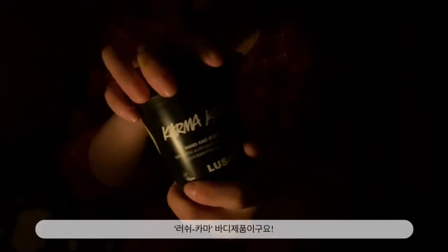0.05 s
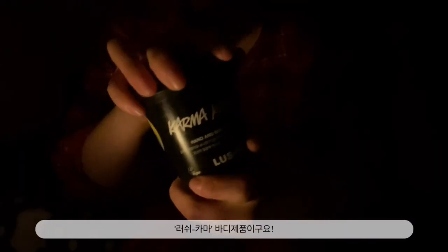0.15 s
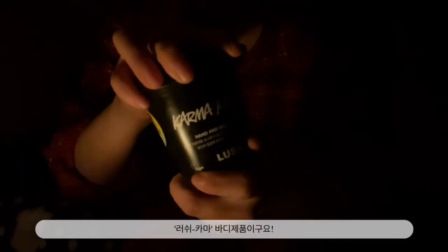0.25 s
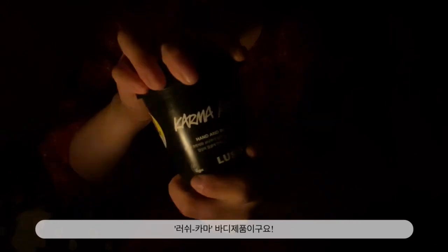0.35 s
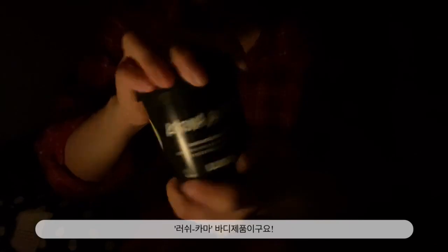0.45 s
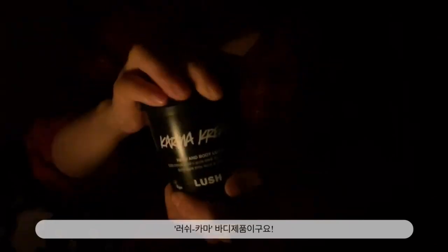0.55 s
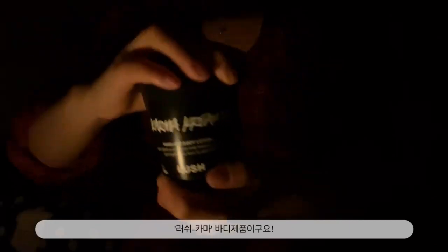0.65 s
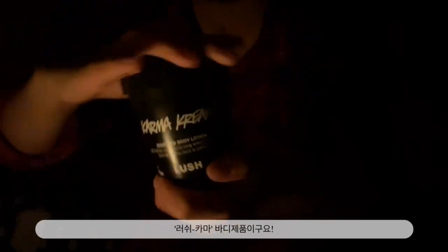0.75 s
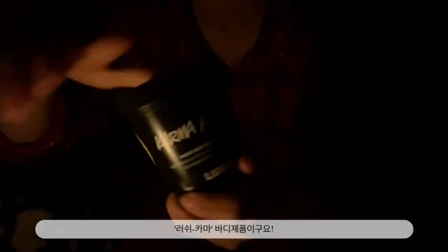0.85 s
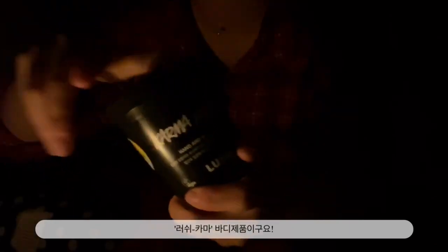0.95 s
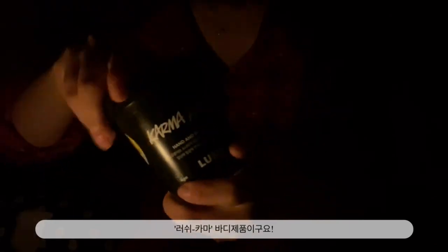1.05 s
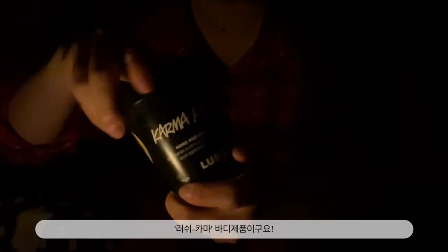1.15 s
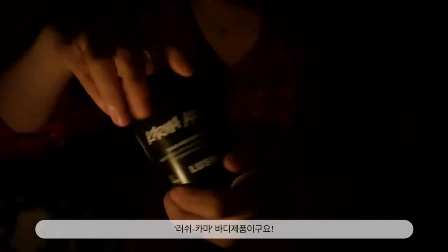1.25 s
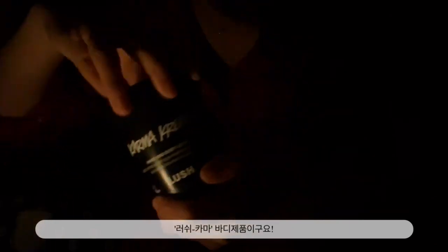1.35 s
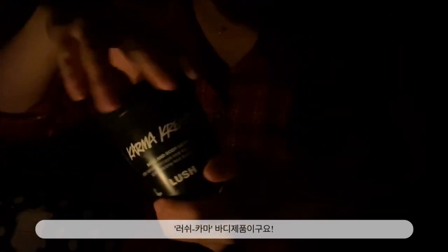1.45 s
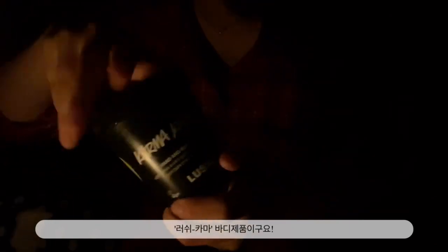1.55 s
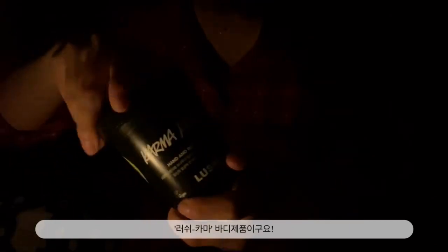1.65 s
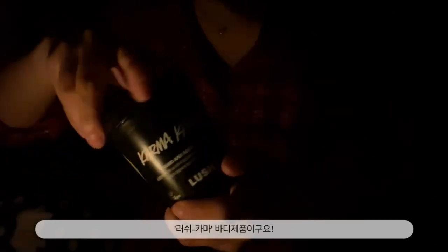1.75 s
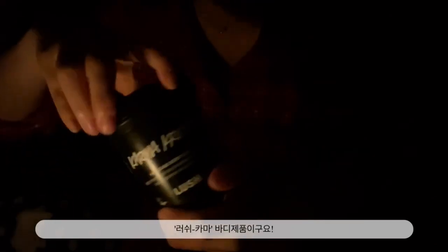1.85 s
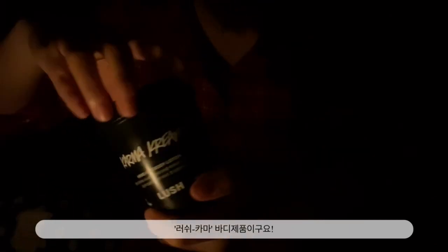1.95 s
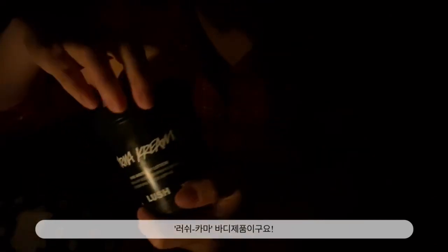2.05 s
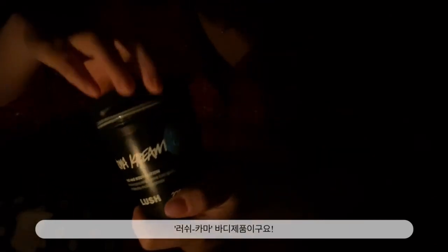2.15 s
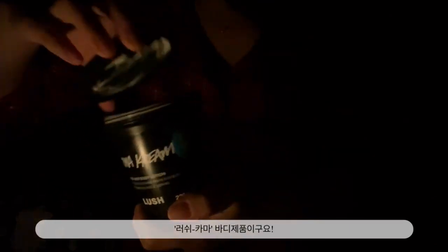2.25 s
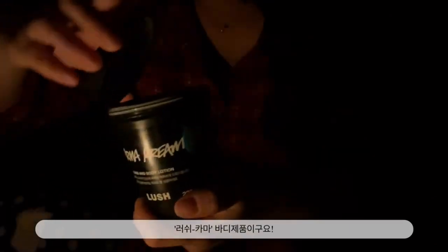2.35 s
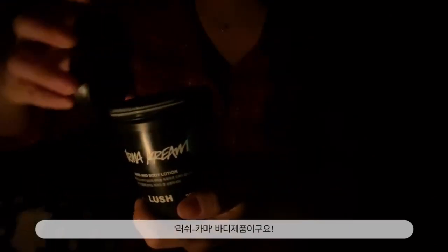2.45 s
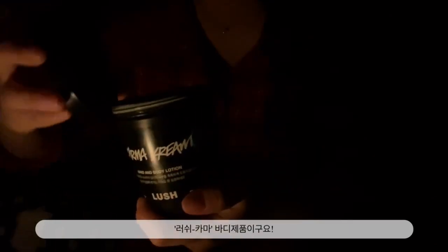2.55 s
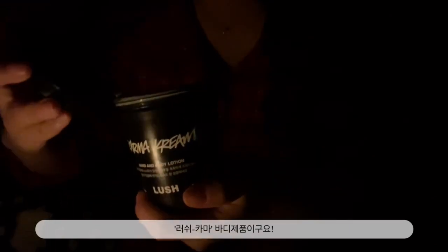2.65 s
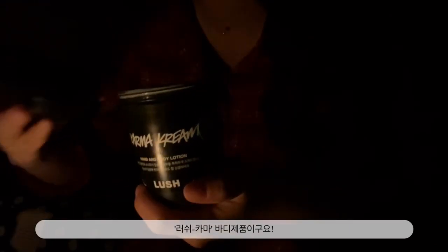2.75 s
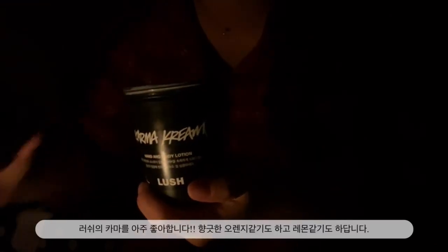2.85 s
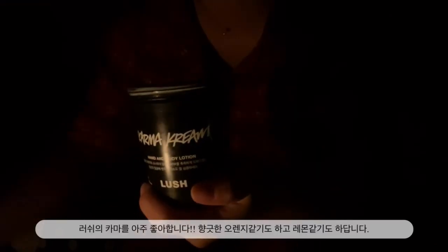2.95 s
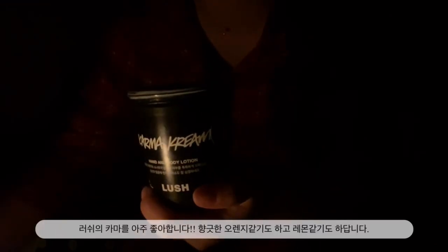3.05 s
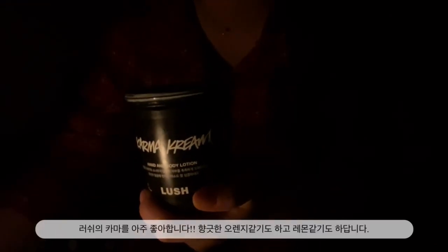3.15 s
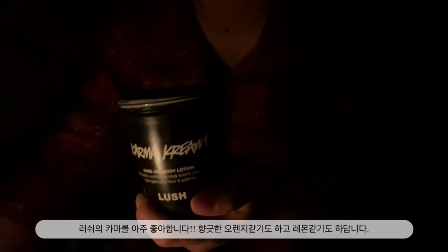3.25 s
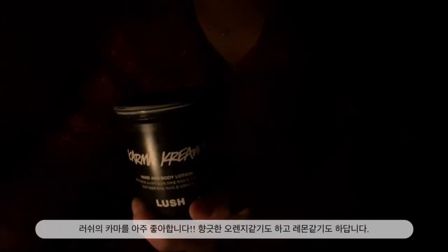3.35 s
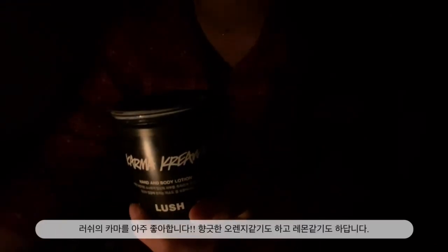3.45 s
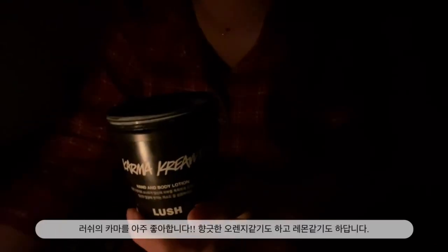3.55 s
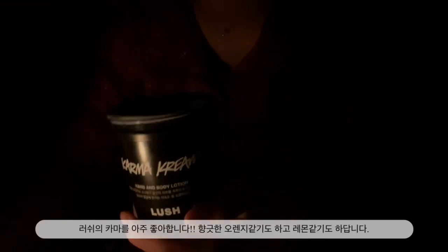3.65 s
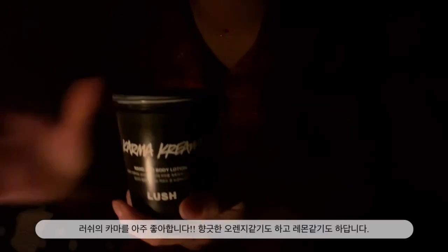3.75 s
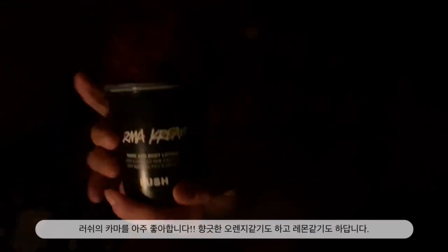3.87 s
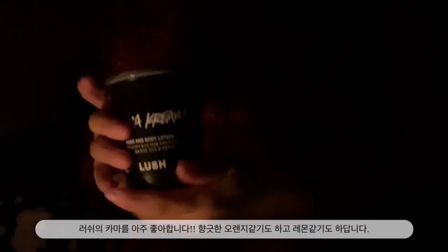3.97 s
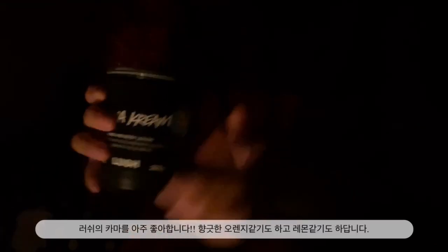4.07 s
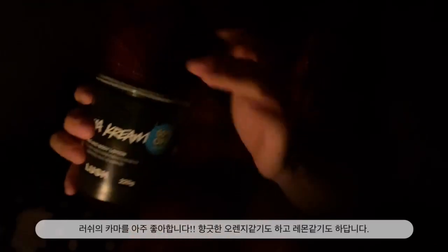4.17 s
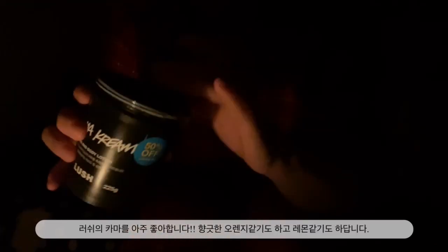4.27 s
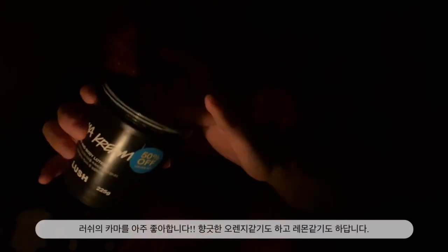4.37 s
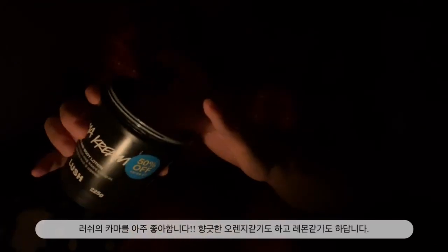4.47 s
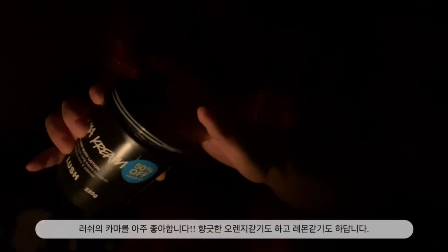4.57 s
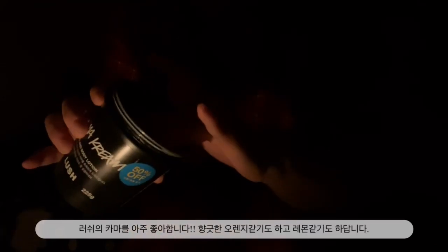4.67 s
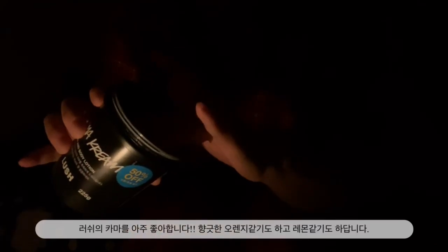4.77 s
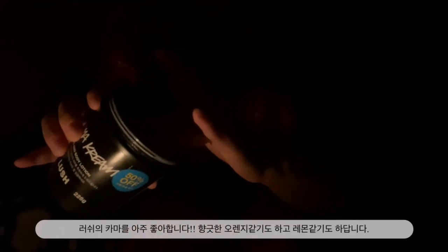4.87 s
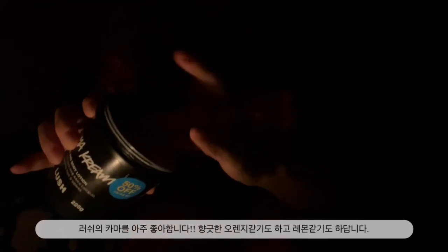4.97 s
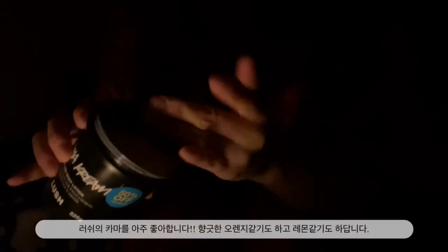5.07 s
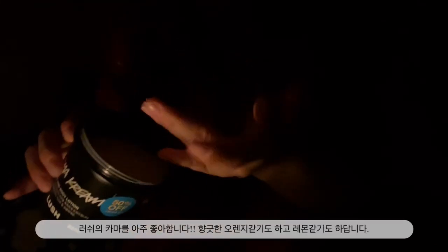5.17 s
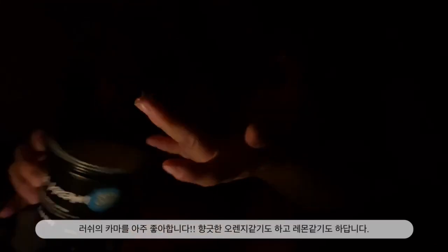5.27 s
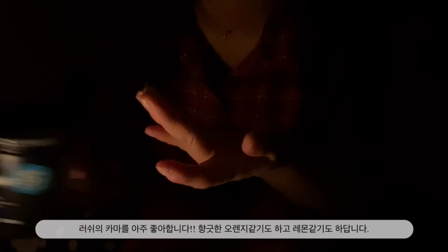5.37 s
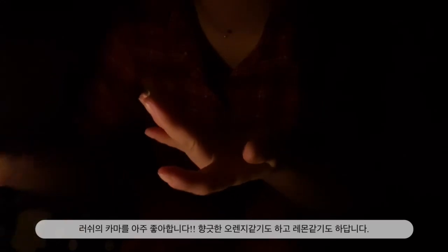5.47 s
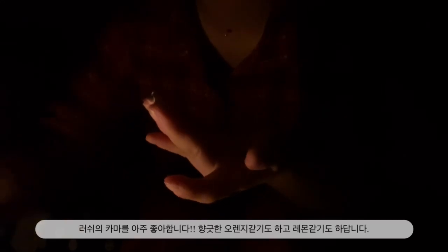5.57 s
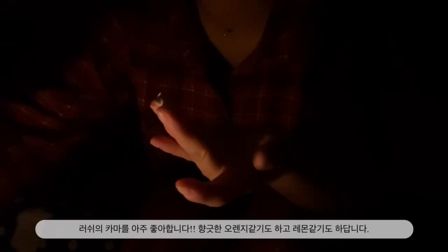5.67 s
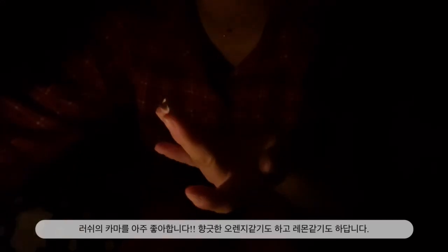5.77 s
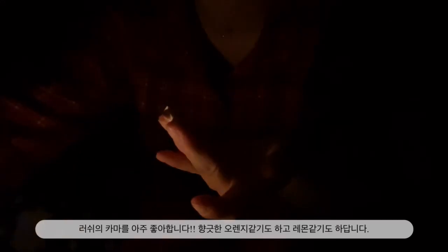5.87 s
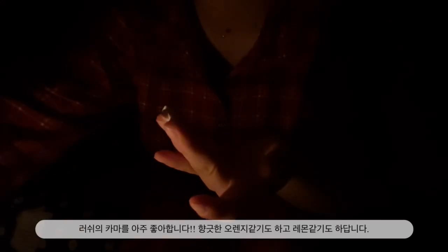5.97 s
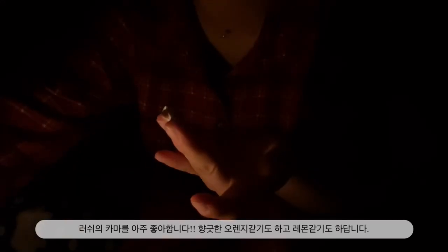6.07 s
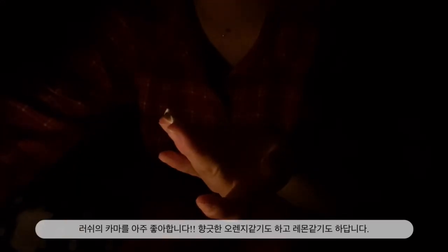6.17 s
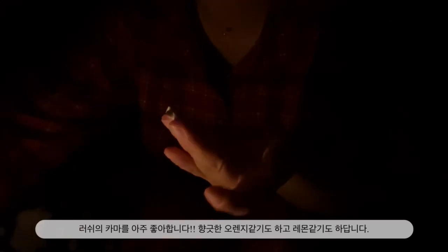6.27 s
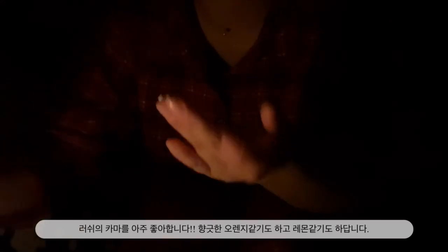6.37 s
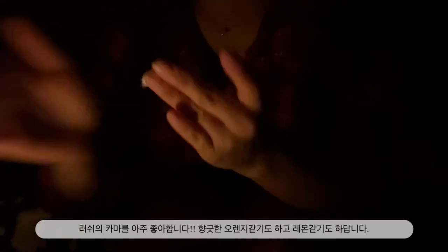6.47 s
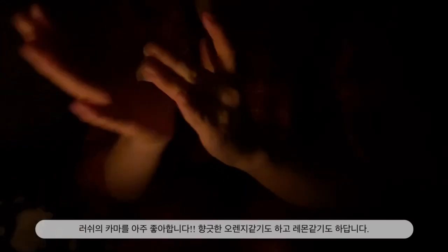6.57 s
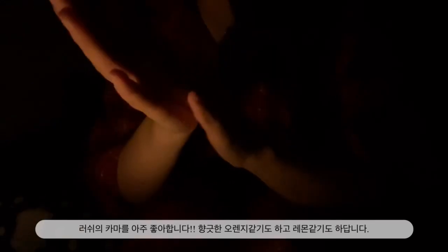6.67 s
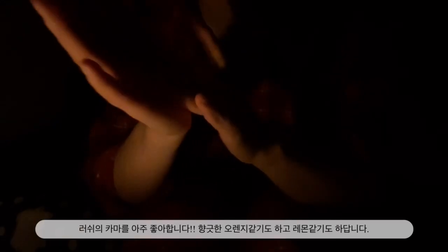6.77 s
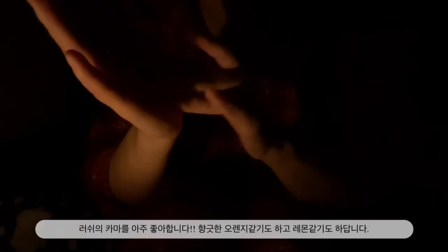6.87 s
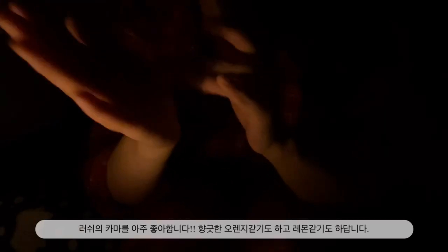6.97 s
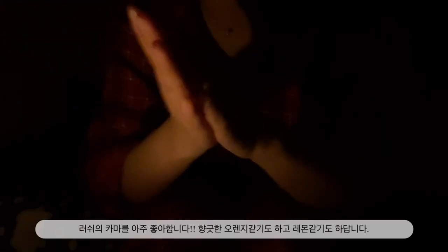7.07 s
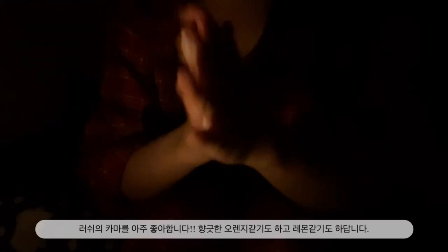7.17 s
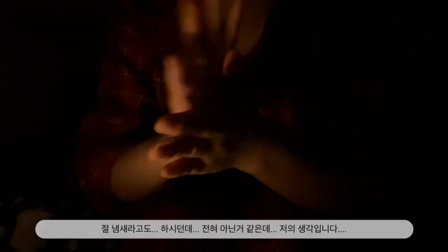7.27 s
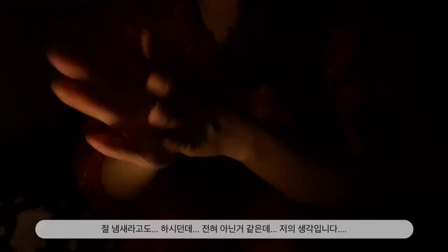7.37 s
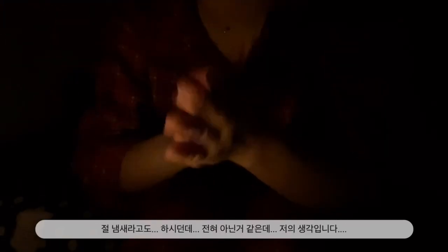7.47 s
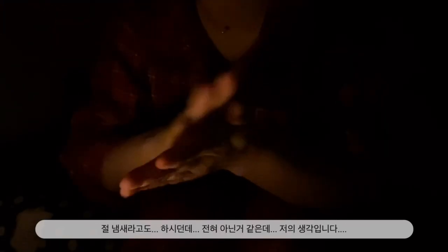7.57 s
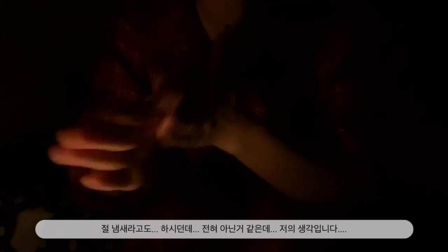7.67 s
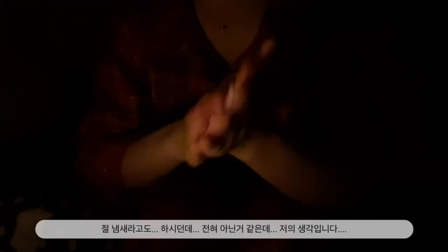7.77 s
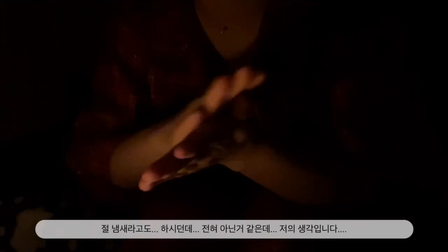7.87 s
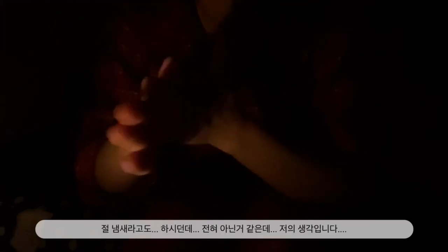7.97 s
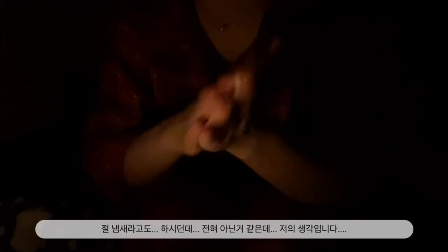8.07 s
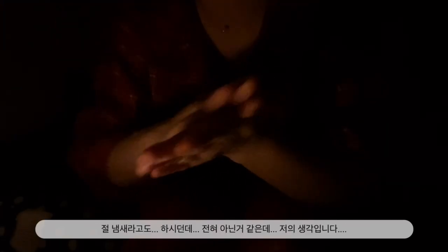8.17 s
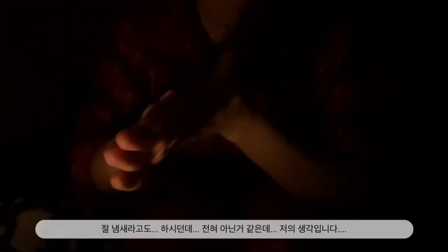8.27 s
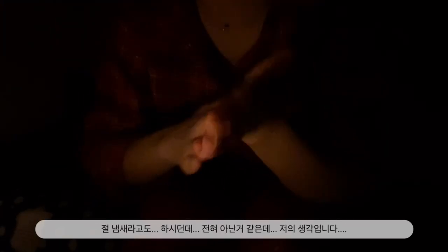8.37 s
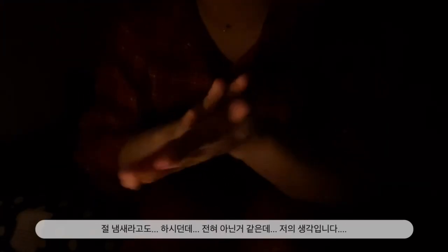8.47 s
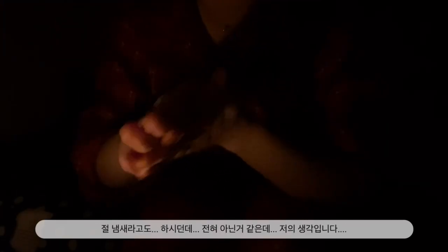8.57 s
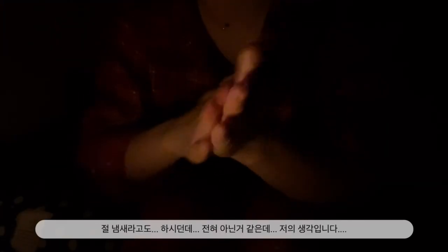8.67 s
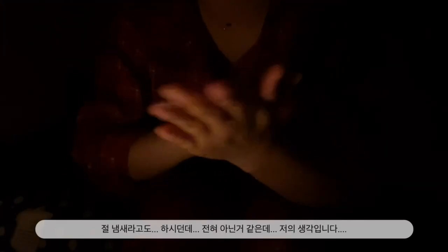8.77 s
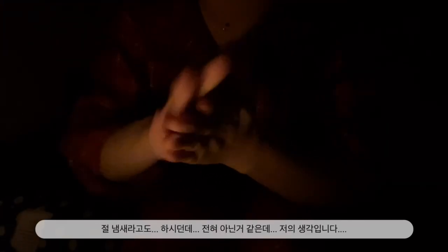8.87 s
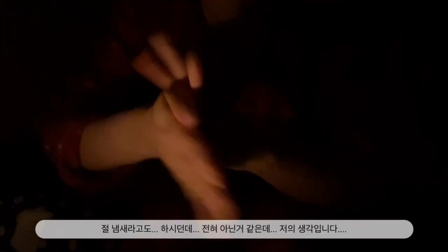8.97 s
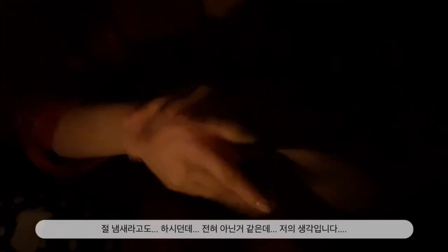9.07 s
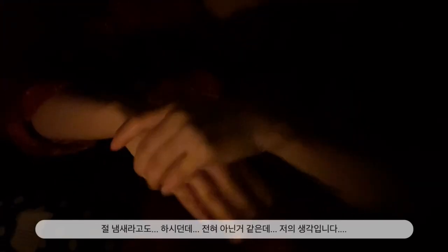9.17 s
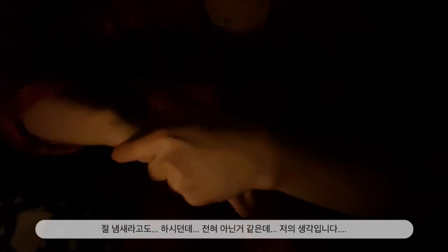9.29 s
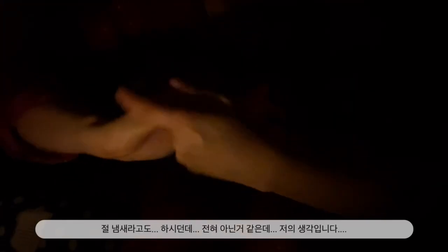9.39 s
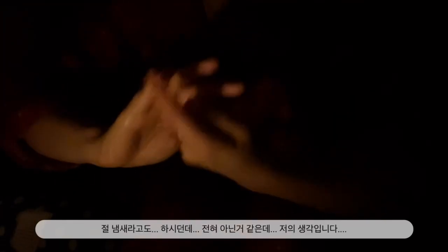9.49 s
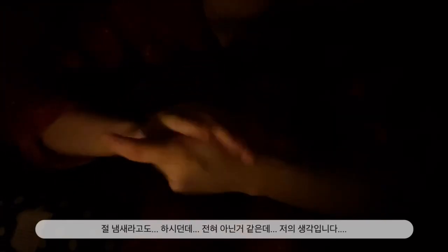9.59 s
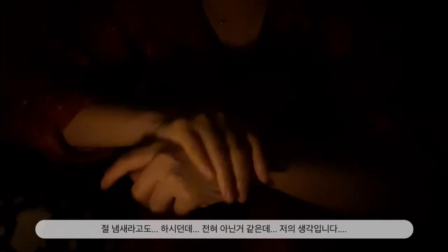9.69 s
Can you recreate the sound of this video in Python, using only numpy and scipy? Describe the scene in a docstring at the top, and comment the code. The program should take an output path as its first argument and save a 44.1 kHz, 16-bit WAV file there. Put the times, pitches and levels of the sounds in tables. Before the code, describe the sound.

Very quiet, intimate handling: light fingertip slides, ticks and brief whistling squeaks as a plastic lid comes off. It is set down on the left with bright plastic clacks and a low thump. A long faint pause follows, then the plastic tub is put down in two low knocks. Moist hands rub in repeated soft hissing strokes until the end, close to the microphone in a small room.

```python
"""Hands close to a stereo microphone in a small quiet room; rumble in room modes, mains hum and faint hiss throughout.
Fingers twist a plastic lid off a tub: knocks ring plastic modes, slides are swelling noise, sines squeak and whistle.
The lid slides on the table and is set down (3.3-3.6 s), then the tub (6.0-6.2 s): cracks, rung modes, table thumps.
From 6.8 s two palms rub cream into the skin: strokes of hiss over a duller band, with short sticky ticks."""
import sys
import numpy as np
from scipy import signal
from scipy.fft import rfft, irfft, next_fast_len
from scipy.io import wavfile
from scipy.ndimage import uniform_filter1d, map_coordinates

SR = 44100
rng = np.random.default_rng(int(sys.argv[2]) if len(sys.argv) > 2 else 0)


def unload_wav(signal):
    """Save mono or channel-first audio to the path in sys.argv[1] as 16-bit WAV at rate SR, clipped to [-1, 1]."""
    wavfile.write(
        sys.argv[1],
        SR,
        np.round(np.clip(np.atleast_2d(signal).T, -1, 1) * 32767).astype(np.int16),
    )


N = 429093


def amp(db):
    """Gain of a level in dB."""
    return 10 ** (np.asarray(db) / 20)


def unit(x):
    """x at rms 1."""
    return x / np.sqrt(np.mean(x ** 2) + 1e-20)


def along(points, hz):
    """(f/Hz, value) points interpolated on a log frequency axis."""
    f, v = np.transpose(points)
    return np.interp(np.log(hz + 1), np.log(f + 1), v)


def wobble(rate_hz):
    """Smooth random curve, rate_hz knots a second."""
    knots = rng.standard_normal(int(N * rate_hz / SR) + 4)
    return map_coordinates(knots, [np.arange(N) * rate_hz / SR])


def filtered(x, response):
    """x times a complex response of frequency; zero-padded FFT."""
    n = x.shape[-1]
    m = next_fast_len(n + 8192)
    return irfft(rfft(x, m) * response(np.fft.rfftfreq(m, 1 / SR)), m)[..., :n]


def resonances(modes):
    """Causal response: sum of (f/Hz, width/Hz, level/dB) resonators of alternating sign."""
    def response(f):
        total = 0
        for k, (f0, width, db) in enumerate(modes):
            total = total + (-1) ** k * amp(db) * 1j * f * width / (f0 * f0 - f * f + 1j * f * width)
        return total
    return response


def colour(spectrum):
    """Response of a (f/Hz, level/dB) spectrum."""
    return lambda hz: amp(along(spectrum, hz))


def sides(pan_db):
    """Left and right gain as a column; pan_db is left over right."""
    return amp(np.array([[pan_db / 2], [-pan_db / 2]]))


def lagged(x, lag_s):
    """The left capsule hears x lag_s later than the right one."""
    return filtered(x, lambda f: np.exp(-1j * np.pi * f * lag_s * np.array([[1], [-1]])))


def pair(response, alike, grit_db=0, patchy_db=0):
    """Stereo noise of rms 1; grit scatters grain size, patches vary gain in time and pitch."""
    white = rng.standard_normal((2, N)) * amp(grit_db * wobble(510))
    z = signal.stft(white, nperseg=512)[2]
    field = uniform_filter1d(rng.standard_normal(z.shape[1:]), size=7, axis=0)  # frequency
    field = uniform_filter1d(field, size=6, axis=1)  # time
    white = signal.istft(z * amp(patchy_db * unit(field)), nperseg=512)[1][:, :N]

    def mid_side(hz):
        turn = np.arccos(np.clip(along(alike, hz), -1, 1)) / 2  # sets left-right likeness
        return response(hz) * [np.cos(turn), np.sin(turn)]
    mid, side = filtered(white, mid_side)
    return unit(np.array([mid + side, mid - side]))


# room modes: f/Hz, width/Hz, level/dB
AIR_MODES = [(53.9, 11, -5), (92.8, 9.3, -3), (122.6, 11, -12.5)]
# floor spectrum: f/Hz, density/dB (relative)
FLOOR_SPECTRUM = [(20, -31), (38, 2), (130, 6.5), (160, 0), (250, 3.5), (500, -9), (1000, -15),
                  (2500, -21.5), (6000, -24), (9500, -31), (12500, -25.5), (16000, -43.5)]
# floor likeness: f/Hz, left-right likeness/1
FLOOR_LIKENESS = [(50, 1), (300, 0.47), (1500, 0.092), (10000, 0.074)]


def room_tone():
    """Noise-driven room modes, a wavering 120 Hz mains hum and a wide faint floor."""
    swell_db = 1.2 * wobble(1.2)
    rumble = pair(resonances(AIR_MODES), [(50, .62)]) * amp(-60.0 + swell_db) * sides(5)
    hum_phase = 2 * np.pi * 120 * np.arange(N) / SR + 0.53 * wobble(3.7)
    hum = amp(-66.0 + 0.4 * wobble(5.6)) * np.sin(hum_phase) * sides(6.0)
    floor = amp(-73.5) * pair(colour(FLOOR_SPECTRUM), FLOOR_LIKENESS) * sides(1.9)
    return lagged(rumble + hum, 0.00022) + floor


# room decay: f/Hz, t60/s
ROOM_T60 = [(100, 0.26), (500, 0.1), (2000, 0.16), (6000, 0.14), (14000, 0.028)]


def tail():
    """New stereo room answer, left energy 1: noise whose frequencies each die at their own speed."""
    hz, t = np.fft.rfftfreq(256, 1 / SR), np.arange(90) * 128 / SR
    re, im = rng.standard_normal((2, 2, len(hz), len(t)))
    decay = amp(-60 * t / along(ROOM_T60, hz)[:, None])
    answer = signal.istft((re + 1j * im) * decay, SR, nperseg=256)[1]
    return answer / np.linalg.norm(answer[0])


DETUNE, VARY_DB = .012, 1.5  # scatter of mode pitch (ratio) and level from blow to blow
PUSH_CUT_RATIO = 6.2  # a push loses treble above this multiple of the favoured pitch


def scattered(modes, favoured_hz, focus_db):
    """Modes as one blow drives them: less by focus_db per octave off the favoured pitch."""
    luck = rng.standard_normal((len(modes), 2)) * [DETUNE, VARY_DB]
    driven = []
    for (f0, width, db), (detune, vary_db) in zip(modes, luck):
        off_octaves = abs(np.log2(f0 / favoured_hz))
        driven.append((f0 * (1 + detune), width, db + vary_db - focus_db * off_octaves))
    return driven


def knocks(hits, modes, crack_s, push_s, touch, crack_hz, focus_db, room_db, lag_s):
    """Each contact is a crack plus a rough push that rings the modes; the room answers both."""
    near, far, t = np.zeros((2, N + SR)), np.zeros((2, N + SR)), np.arange(SR // 10) / SR
    for s, db, ring_db, hz, pan_db in hits:
        # bursts fall 60 dB in crack_s and push_s
        burst = rng.standard_normal((2, len(t))) * amp(-60 * t / np.array([[crack_s], [push_s]]))
        burst[:, 0] = 4, touch  # strong first touch
        burst = filtered(burst, lambda f: 1 / (1 + 1j * f / crack_hz) ** 3)
        crack = filtered(burst[0], lambda f: 1j * f / (crack_hz / 6 + 1j * f))
        body = resonances(scattered(modes, hz, focus_db))
        ring = filtered(burst[1], lambda f: body(f) / (1 + 1j * f / (PUSH_CUT_RATIO * hz)) ** 2)
        contact = amp(db) * (crack / np.abs(crack).max() + amp(ring_db) * ring / np.abs(ring).max())
        near[:, round(s * SR):][:, :len(t)] += contact * sides(pan_db)
        wet = signal.fftconvolve(contact[None], tail(), axes=1)
        far[:, round((s + .004) * SR):][:, :wet.shape[1]] += wet
    return lagged(near[:, :N], lag_s) + amp(room_db) * far[:, :N]


# lid contacts: t/s, crack level/dB, ring re crack/dB, favoured f/Hz, left re right/dB
LID_HITS = [(.2874, -69, 14.5, 633, -9.5), (.4554, -52.5, 7.5, 1320, -19.5), (2.0763, -49.5, -7, 1500, -4),
            (2.086, -62, -6, 4300, -2), (2.1352, -62, 15.5, 920, -2), (2.392, -54.5, 13.5, 1850, -10.5),
            (2.424, -55.5, 11, 1800, -17), (2.452, -66.5, 17.5, 1770, -17), (3.3345, -48.5, 4.5, 2050, 9),
            (3.3372, -19.5, 2.5, 770, 5.5), (3.5344, -10, 1, 2707, 5.5), (3.538, -25.5, 10.5, 985, -4),
            (3.55, -31.5, 3, 905, -5), (3.557, -29.5, 3.5, 4240, 2), (3.5647, -21, 1.5, 2720, 1),
            (3.568, -32, 15.5, 985, -2), (3.5814, -10, -5.5, 2197, 0), (3.5845, -34.5, 13, 690, 1),
            (3.5997, -34, 9.5, 1200, 2.5), (3.9687, -49, -14, 5100, -8)]
# damped plastic modes of the lid: f/Hz, width/Hz, level/dB
LID_MODES = [(254, 80, 1), (424, 82, -4.5), (684, 32, 3.5), (900, 60, -5.5), (985, 24, -0.5),
             (1120, 110, -3.5), (1545, 160, -3.5), (1793, 110, 2), (1950, 80, 0.5), (2245, 90, -2),
             (2433, 90, -4), (2694, 70, 2), (3750, 260, -7), (4250, 350, -4.5), (5100, 2000, -10),
             (7800, 1600, -15.5)]


def lid_knocks():
    """Blows ring the lid's damped plastic modes."""
    return knocks(LID_HITS, LID_MODES, crack_s=0.012, push_s=0.014, touch=14, crack_hz=12100,
                  focus_db=6.5, room_db=-7, lag_s=-.00027)


EDGE_DB = 20  # a rise or fall is the time to change by this much


def swells(rows, rounded, body_swing, treble_swing):
    """Gains of hiss, body and treble: strokes swell and fade, each band with its own dB swing."""
    t, hiss, body, treble = np.arange(0, N + 64, 64) / SR, 0, 0, 0
    for s, rise, fall, db, body_db in rows:
        down_db = EDGE_DB * np.where(t < s, (s - t) / rise, (t - s) / fall) ** rounded
        hiss = hiss + amp(db - down_db) ** 2
        body = body + amp(db + body_db - body_swing * down_db) ** 2
        treble = treble + amp(db - treble_swing * down_db) ** 2
    return [np.interp(np.arange(N) / SR, t, np.sqrt(power)) for power in (hiss, body, treble)]


TREBLE_HZ = 9000
# sliding hiss above TREBLE_HZ: t/s, level re its spectrum/dB
TREBLE_LEVEL = [(0, -7), (0.902, -1.5), (1.25, 0.5), (1.7, 0.5), (3.6, -4), (4, 2), (6.702, -1),
                (7.2, -0.5), (8.301, -2.5), (8.75, 0.5), (9.1, -6.5)]


def stroke(rows, hiss, body, alike, rounded, body_swing, treble_swing, grit_db, patchy_db,
           flutter_db, pan_db, lag_s):
    """Sliding contact: hissing noise, and the rubbed thing adds a duller band."""
    hiss_gain, body_gain, treble_gain = swells(rows, rounded, body_swing, treble_swing)
    treble_db = np.interp(np.arange(N) / SR, *np.transpose(TREBLE_LEVEL))
    fine = pair(colour(hiss), alike, grit_db, patchy_db)
    treble = filtered(fine, lambda hz: hz > TREBLE_HZ)
    fine = hiss_gain * (fine - treble) + treble_gain * amp(treble_db) * treble
    dull = body_gain * pair(body, alike, grit_db, patchy_db)
    flutter = amp(flutter_db * wobble(47))
    return lagged(flutter * sides(pan_db) * (fine + dull), lag_s)


# fingers on the lid; about 3.4-3.5 s the lid on the table:
# peak t/s, rise/s, fall/s, hiss level/dB, body re hiss/dB
LID_SLIDES = [(.354, 0.025, 0.024, -62, -5), (.464, 0.0078, 0.079, -55.5, -5.5),
              (.63, 0.11, 0.24, -65.5, -10), (.728, 0.034, 0.061, -62, -24),
              (.786, 0.058, 0.017, -66.5, -19), (.843, 0.02, 0.014, -63.5, -27),
              (1.018, 0.016, 0.019, -63.5, -53.5), (1.18, 0.051, 0.19, -65.5, -10.5),
              (1.3, 0.44, 0.1, -63.5, -8), (1.395, 0.38, 0.017, -65, -7.5), (1.459, 0.021, 0.014, -71.5, 1),
              (1.606, 0.022, 0.034, -77.5, 0.5), (1.825, 0.12, 0.17, -68, -1.5),
              (1.95, 0.22, 0.26, -78.5, 0.5), (2.087, 0.046, 0.1, -67.5, 0),
              (2.167, 0.073, 0.027, -63.5, 4.5), (2.43, 0.032, 0.036, -70.5, 13),
              (3.382, 0.05, 0.048, -58.5, 8.5), (3.45, 0.12, 0.072, -77.5, 16.5),
              (3.51, 0.075, 0.18, -64.5, 10.5), (3.533, .016, .01, -48, 10),
              (3.925, 0.078, 0.077, -68.5, -10), (3.991, 0.043, 0.033, -56.5, -11.5),
              (4.04, .03, 0.25, -79.5, -18), (5.126, 0.28, .1, -82.5, -25), (5.228, .15, 0.22, -83, -22),
              (5.645, .05, 0.051, -78, -4)]
# noise shape of these slides, with a dip at 9 kHz that is no property of plastic:
# f/Hz, density/dB (relative)
SLIDE_HISS = [(1500, -42), (2800, -3), (4500, -1.5), (6500, 2.5), (8100, 2), (9000, -13.5), (10000, -0.5),
              (11500, 4), (13500, -0.5), (14400, -15.5), (16000, -15.5)]
GRIP = 4  # lid modes are this many times wider in a slide


def lid_slides():
    """Slides of fingers on the lid, then of the lid on the table: hiss plus broadened lid modes."""
    broadened = [(f0, GRIP * width, db) for f0, width, db in LID_MODES]
    return stroke(LID_SLIDES, SLIDE_HISS, resonances(broadened), [(1000, 0.51), (8000, 0.21)],
                  rounded=0.93, body_swing=0.93, treble_swing=1.0, grit_db=1.5, patchy_db=1.5,
                  flutter_db=1.14, pan_db=-1.0, lag_s=.00005)


# weight shaking the table: t/s, peak level/dB
THUMPS = [(0.458, -40.5), (3.599, -38), (3.63, -40.5), (6.014, -35), (6.178, -39), (7.069, -44.5)]
# low table modes: f/Hz, width/Hz, level/dB
TABLE_MODES = [(57, 3.3, 3.5), (91, 22, 3)]


def thumps():
    """One push each into the low modes of the table."""
    push = np.zeros(N)
    for s, db in THUMPS:
        push[round(s * SR)] = amp(db)
    swing = filtered(np.arange(SR // 8) == 0, resonances(TABLE_MODES))  # impulse response
    return signal.fftconvolve(push, swing / np.abs(swing).max())[:N] * sides(3.2)


# gliding air-gap tones and near-steady tones of the rubbed lid, one list a tone:
# t/s, f/Hz, level/dB
SQUEAK_TONES = [
    [(.495, 2970, -80), (.51, 1974, -66), (.527, 1120, -67), (.56, 1034, -92), (.59, 1800, -79),
     (.62, 2520, -78), (.64, 2620, -74), (.665, 2400, -76), (.69, 1950, -75), (.71, 1800, -83)],
    [(.475, 3000, -72), (.49, 2980, -65), (.52, 2860, -77)],
    [(.605, 1090, -84), (.62, 1134, -79), (.65, 1200, -79)],
    [(1.195, 3000, -73), (1.245, 4200, -74), (1.275, 4100, -78)],
    [(2.128, 747, -55), (2.147, 700, -54.5), (2.165, 626, -50.5)],
    [(2.15, 1000, -66), (2.182, 1300, -63)],
    [(2.152, 2960, -70), (2.168, 3220, -55.5), (2.19, 3100, -77)],
]
ROUGH_HZ = 2600  # phase jitter scales as mean pitch over this


def squeaks():
    """Air gaps whistle in glides, the rubbed lid near-steadily: sines jittered in phase and level."""
    jitter_rad, flicker_db, out = wobble(300), 3 * wobble(90), np.zeros(N)
    for rows in SQUEAK_TONES:
        s, hz, db = np.transpose(rows)
        i = np.arange(round(s[0] * SR), round(s[-1] * SR))
        phase = 2 * np.pi * np.cumsum(np.interp(i / SR, s, hz)) / SR
        phase += np.mean(hz) / ROUGH_HZ * jitter_rad[i]
        level_db = np.interp(i / SR, s, db) + flicker_db[i]
        out[i] += np.hanning(len(i)) ** .2 * amp(level_db) * np.sin(phase)
    return out


# handling ticks up to 5.5 s, sticky skin ticks and pats from 7 s:
# t/s, crack level/dB, pat re crack/dB, favoured f/Hz, left re right/dB
TICKS = [(.7213, -53.5, 3, 2400, -5), (.7615, -50.5, 0, 3970, -10), (1.3035, -51.5, 5.5, 2300, -7.5),
         (5.4495, -74.5, 20.5, 5840, -2), (7.065, -40.5, -7.5, 400, -6), (7.0746, -41, 10, 2920, -9),
         (7.2246, -41.5, -5, 5650, -3), (7.474, -54, 2, 908, -10), (7.6023, -53.5, 12, 5500, -13),
         (7.612, -55, 5, 497, -4), (7.7484, -46, -3, 2300, 5), (7.911, -55, 5, 1500, -6),
         (7.922, -53.5, 6, 1200, -3), (8.2095, -53, 6, 1240, -1.5), (8.4688, -50, 6, 6120, 2),
         (8.5111, -37.5, -4.5, 1980, 1), (8.5448, -42, -3, 787, 0), (8.809, -53, 9, 5640, -3),
         (8.8644, -52.5, 3, 450, -3), (9.059, -52.5, -4, 5830, -1.5), (9.5894, -62, 4.5, 802, -4),
         (9.71, -58.5, 7, 960, 5)]
# broad modes of cupped skin: f/Hz, width/Hz, level/dB
HAND_MODES = [(400, 890, 1), (1200, 820, -8), (2300, 620, 1), (6000, 2800, 6), (11300, 4000, -33)]


def ticks():
    """Short ticks and pats of handling, later of sticky skin: brief bursts in broad modes."""
    return knocks(TICKS, HAND_MODES, crack_s=0.0028, push_s=.007, touch=13.8, crack_hz=16000,
                  focus_db=12.0, room_db=-5.5, lag_s=0.00015)


# tub contacts: t/s, crack level/dB, ring re crack/dB, favoured f/Hz, left re right/dB
TUB_HITS = [(1.0113, -85.5, 31, 251, 1), (5.48, -88.5, 38, 400, 0), (5.997, -81, 43, 800, 7),
            (6.0055, -31.5, 11.5, 1033, 5), (6.012, -61, 36, 206, 7), (6.0286, -60, 29, 450, -5),
            (6.0455, -56, 20, 700, 7), (6.1678, -29.5, 9, 1820, 3), (6.169, -46.5, 28, 850, 12.5),
            (6.1753, -60, 34, 224, 12)]
# damped plastic modes of the tub: f/Hz, width/Hz, level/dB
TUB_MODES = [(190, 50, 0.5), (261.7, 66, -0.5), (450, 70, 0), (700, 100, -1.5), (770, 75, -2.5),
             (986, 77, -5.5), (1200, 140, -5), (1500, 530, -4.5), (2500, 1600, -4), (4500, 3000, -13)]


def tub_knocks():
    """Blows ring the tub's damped plastic modes."""
    return knocks(TUB_HITS, TUB_MODES, crack_s=0.012, push_s=0.018, touch=15, crack_hz=4500,
                  focus_db=15.5, room_db=-4, lag_s=-0.00027)


# palms on each other: peak t/s, rise/s, fall/s, hiss level/dB, body re hiss/dB
PALM_STROKES = [(6.773, 0.18, 0.19, -65, -25), (6.929, 0.098, 0.021, -67.5, -14.5),
                (7.076, 0.012, 0.085, -47.5, -5), (7.176, 0.082, 0.079, -54.5, -11),
                (7.318, 0.11, 0.12, -51, -16), (7.4, 0.07, 0.17, -56, -26),
                (7.471, 0.058, 0.063, -50.5, -4.5), (7.611, 0.1, .12, -51.5, -12),
                (7.757, 0.06, 0.14, -55.5, -11.5), (7.91, 0.064, 0.13, -56.5, -8.5),
                (8.054, 0.055, 0.1, -56.5, -8.5), (8.216, 0.073, 0.079, -55, -6.5),
                (8.323, 0.11, 0.23, -63.5, -13), (8.511, 0.0092, 0.022, -46.5, -22),
                (8.551, 0.07, 0.036, -54, -2.5), (8.648, 0.07, 0.15, -61.5, -7),
                (8.835, 0.061, 0.25, -58, -13), (9.087, 0.036, 0.061, -49.5, -19),
                (9.18, 0.13, 0.12, -57, -12.5), (9.35, 0.058, 0.1, -59.5, -10.5),
                (9.43, 0.16, 0.039, -55.5, -11.5), (9.565, 0.042, 0.19, -56, -14),
                (9.64, 0.076, 0.25, -57, -12)]
# noise shape of rubbing palms, with a narrow hole at 9 kHz that is no property of skin:
# f/Hz, density/dB (relative)
PALM_HISS = [(1500, -20), (2800, -7), (4500, -1), (6500, 1.5), (8100, 0.5), (9000, -32), (10000, 1),
             (11500, 3.5), (13500, 0), (14400, -6), (16000, -9)]
# duller skin band: f/Hz, density/dB (relative)
SKIN_BODY = [(250, -17), (600, -22.5), (1200, -9.5), (2200, -6.5), (3500, -3), (6000, -48)]


def palm_strokes():
    """Skin friction: treble hiss over a duller skin band, swelling with each stroke."""
    return stroke(PALM_STROKES, PALM_HISS, colour(SKIN_BODY), [(1000, 0.64), (8000, 0.053)],
                  rounded=1.3, body_swing=1.63, treble_swing=0.85, grit_db=2.2, patchy_db=2.4,
                  flutter_db=.9, pan_db=-1.0, lag_s=.00013)


def scene():
    """All sources at the microphone."""
    opening = room_tone() + lid_knocks() + lid_slides() + thumps() + squeaks()
    return opening + ticks() + tub_knocks() + palm_strokes()


TOP_HZ, TOP_STEEP = 15600, 40  # -6 dB point, exponent of the fall


def record(dry):
    """Band limit of the recorder: a steep low-pass."""
    return filtered(dry, lambda hz: amp(-6 * np.minimum(hz / TOP_HZ, 1.1) ** TOP_STEEP))


dry = scene()
out = record(dry)
unload_wav(out)
```